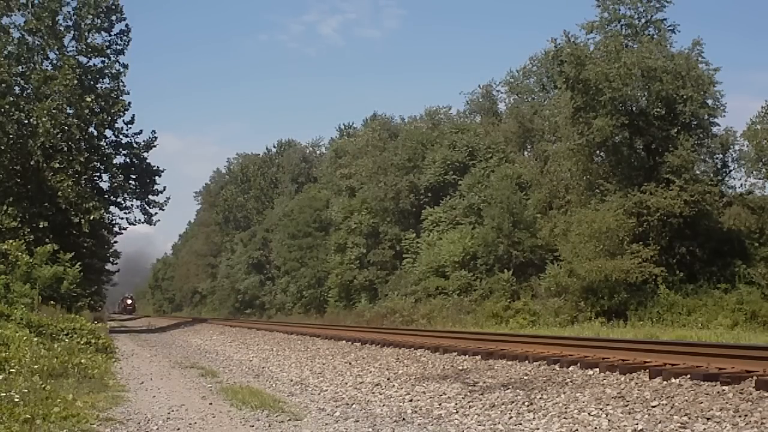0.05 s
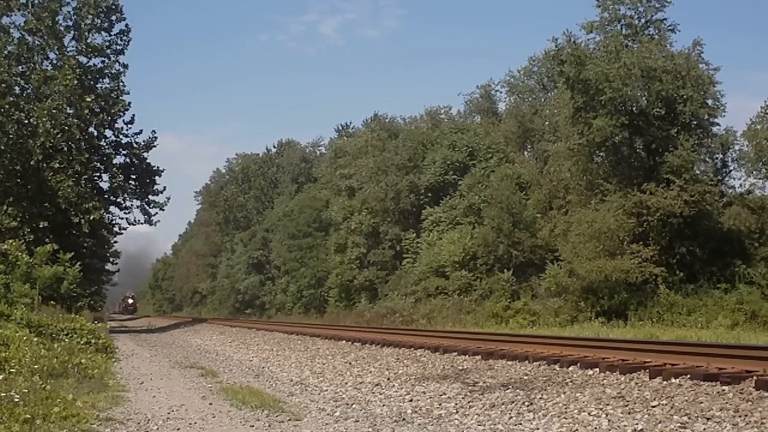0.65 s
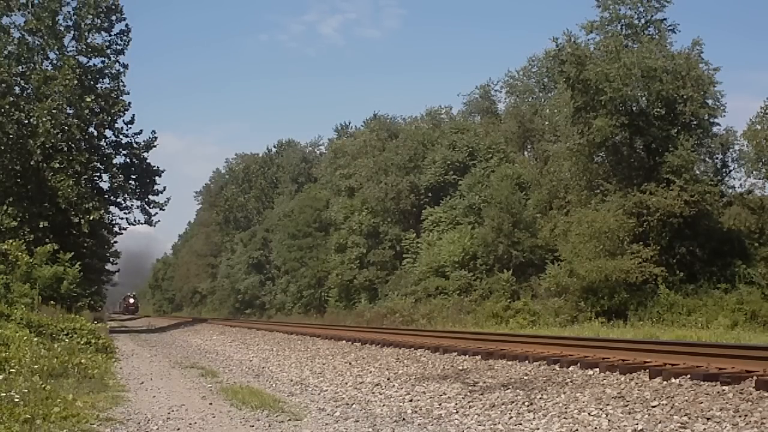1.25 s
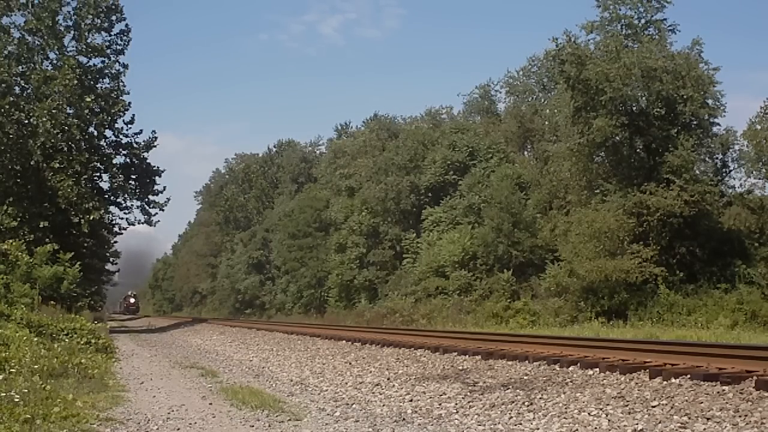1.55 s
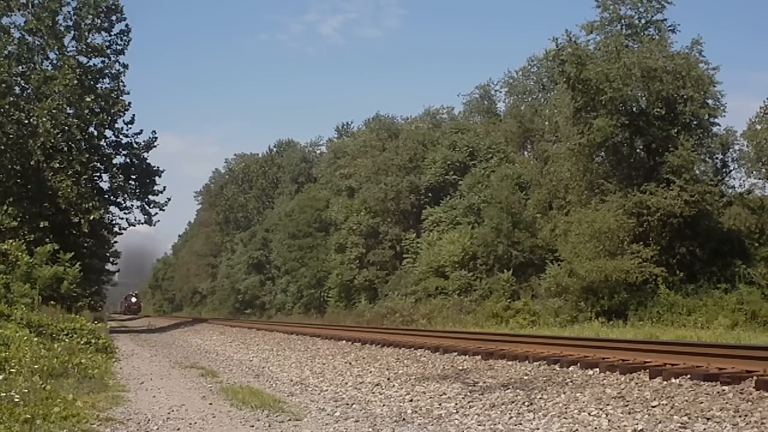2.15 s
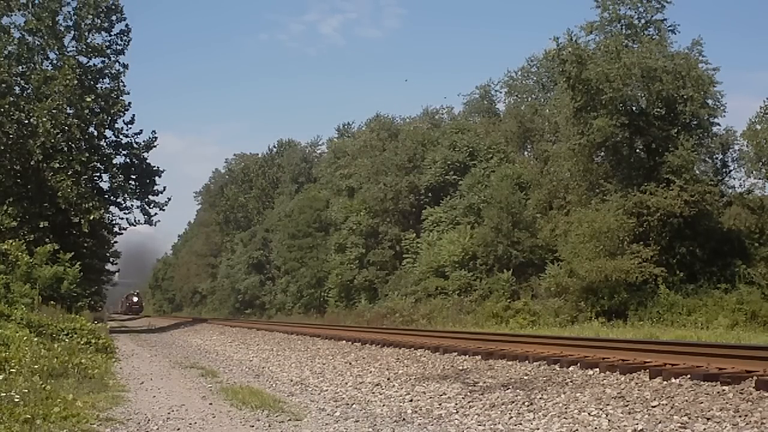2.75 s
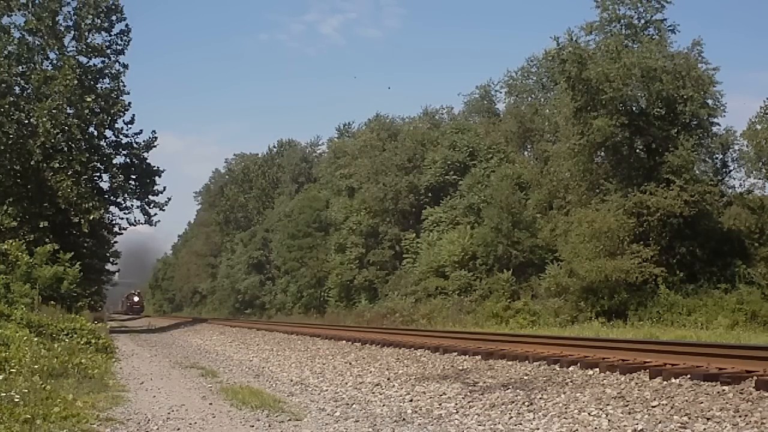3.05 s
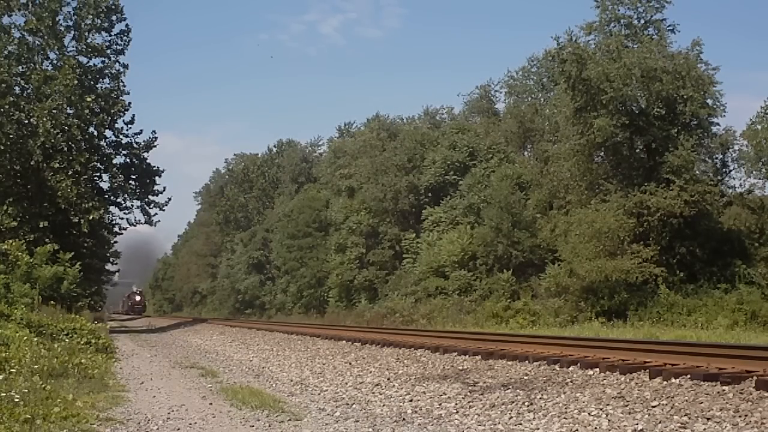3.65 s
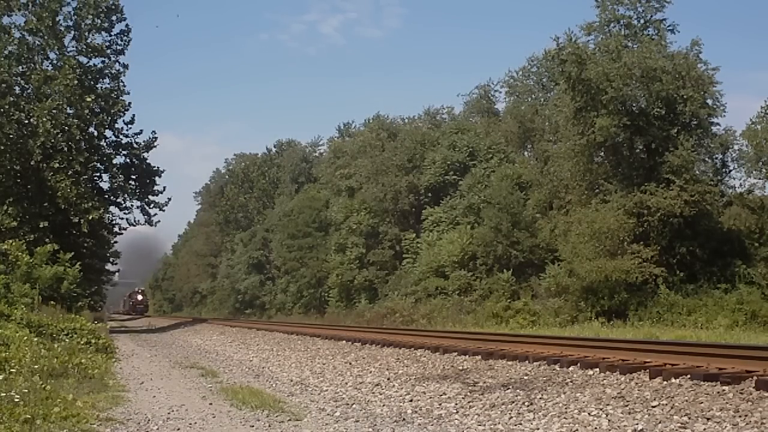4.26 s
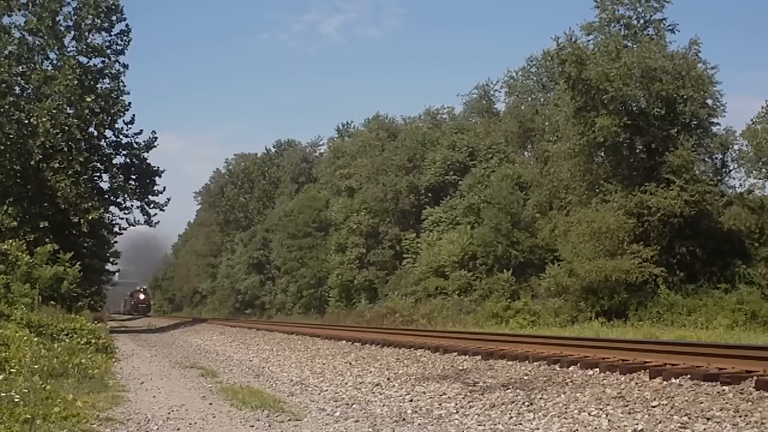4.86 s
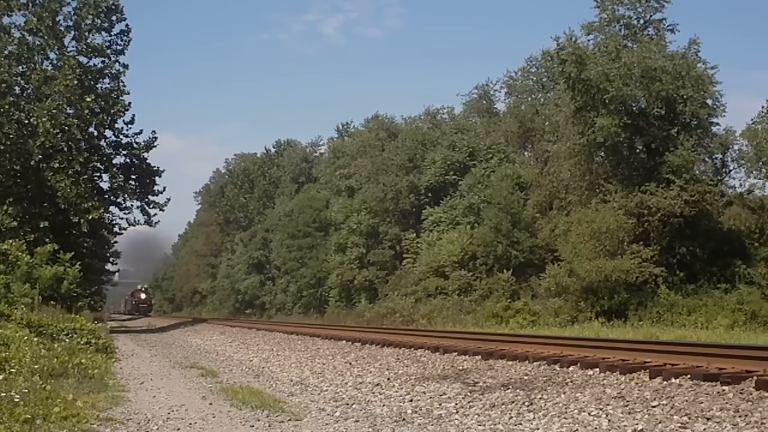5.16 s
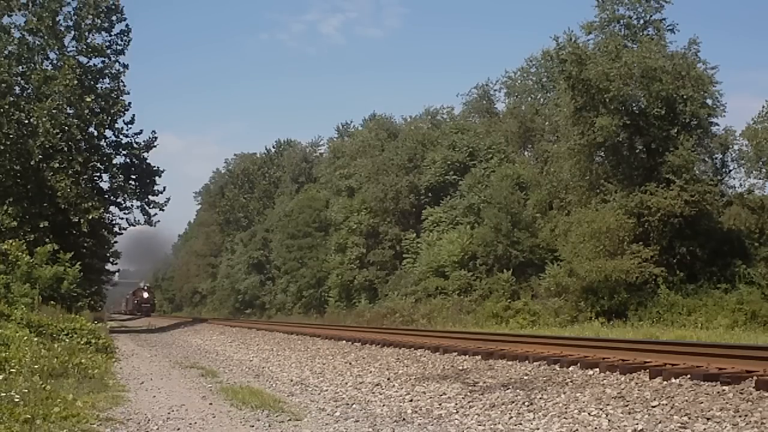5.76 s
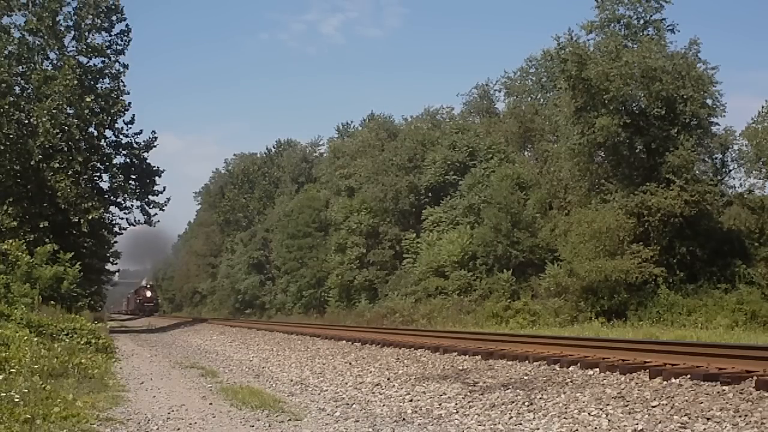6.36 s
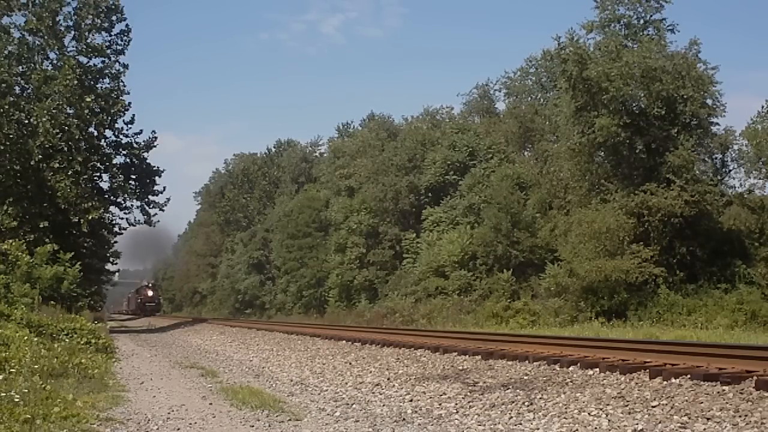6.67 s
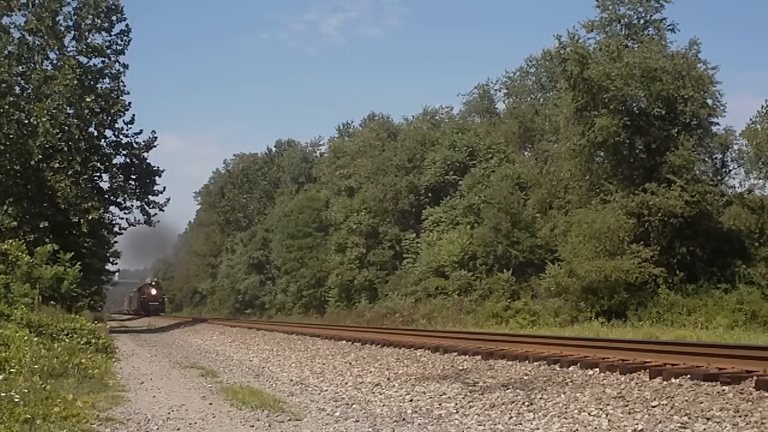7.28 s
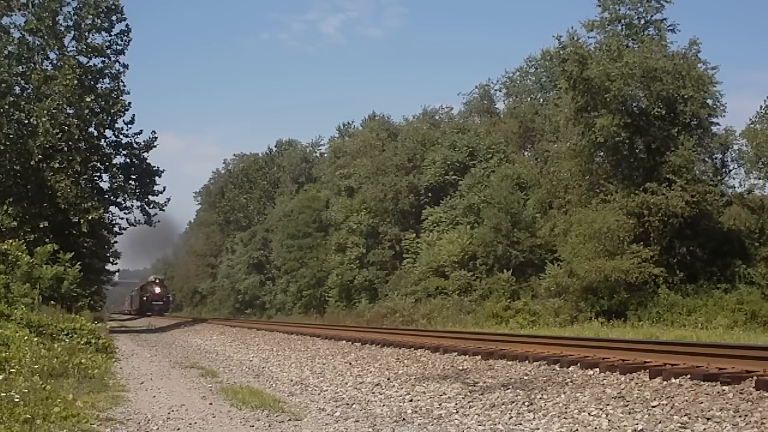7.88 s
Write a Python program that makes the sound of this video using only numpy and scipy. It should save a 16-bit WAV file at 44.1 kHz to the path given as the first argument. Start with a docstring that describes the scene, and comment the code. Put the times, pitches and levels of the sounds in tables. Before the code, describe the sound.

Rapid, rhythmic chuffing from a distant steam engine carries through the woods to a trackside microphone, over a soft rolling roar and a faint steam leak. The level holds fairly steady at first, then the beats gain a deeper boom. Toward the end the puffs, spitting steam and running noise all build clearly as the locomotive closes in, still approaching without passing.

```python
"""Beside a wooded railway line, a steam locomotive approaches at speed, some twelve beats a second.
Each exhaust beat is a turbulent puff from the chimney: a low thud, a resonant bark, a narrow ring
and a hiss of steam. Under them the running train roars, leaks steam and rumbles; train and thud grow
as it nears. A bank colours the sound, which is a little hollow at first, and the woods smear the beats."""
import sys
import numpy as np
from scipy import signal
from scipy.fft import rfft, irfft, next_fast_len
from scipy.io import wavfile
from scipy.ndimage import map_coordinates

SR = 44100
rng = np.random.default_rng(int(sys.argv[2]) if len(sys.argv) > 2 else 0)


def to_wav(s):
    """Save 16-bit WAV."""
    ch = np.atleast_2d(s).T  # columns
    pcm = np.round(np.clip(ch, -1, 1) * 32767)  # PCM
    wavfile.write(sys.argv[1], SR, pcm.astype(np.int16))


N = 353680


def amp(db):
    """Decibels to gain."""
    return 10 ** (np.asarray(db) / 20)


def unit(x):
    """x at rms 1."""
    return x / np.sqrt(np.mean(x ** 2) + 1e-20)


def along(points, hz):
    """Read (Hz, value) points on a log frequency axis."""
    point_hz, values = np.transpose(points)
    return np.interp(np.log(hz + 1), np.log(point_hz + 1), values)


def curves(rows):
    """One automation curve, a value per sample, for each column after the time."""
    times, *columns = np.transpose(rows)
    return [np.interp(np.arange(N) / SR, times, column) for column in columns]


def wobble(rate):
    """A smooth random curve, rate knots a second."""
    knots = rng.standard_normal(int(N * rate / SR) + 4)
    return map_coordinates(knots, [np.arange(N) * rate / SR])


def filtered(x, response):
    """x through an EQ whose gain is response(hz)."""
    size = next_fast_len(N + SR // 2)
    return irfft(rfft(x, size) * response(np.fft.rfftfreq(size, 1 / SR)), size)[:N]


# Four beats to a wheel turn; uneven valves make the middle two stronger.
# Each row: seconds into the turn, bark accent in dB, hiss accent in dB.
TURN_BEATS = [(0.004, -2, -1), (0.084, 0.5, 3), (0.161, -1.03, 1.85), (0.246, -2, -1)]
# Single beats that hit harder or softer. Each row: time in seconds, extra bark in dB, extra hiss in dB.
STANDOUT_BEATS = [(0.40, 0.5, -1), (0.48, 1, -2.5), (0.72, 0.5, 0), (0.80, 1, 2), (1.05, -0.5, 0.5),
                  (1.13, 2, -3), (1.37, 0, -0.5), (1.45, 1.5, 1), (1.53, 1.5, 3.5), (1.61, 2.5, 0),
                  (1.69, 2, 1.2), (1.77, 1, 2), (2.01, 0.5, -0.5), (2.09, 1.5, 1), (2.17, -0.5, 1),
                  (2.25, 1.5, 1), (2.33, -0.2, 0), (2.41, 1, -0.5), (2.65, 0.5, -1), (2.90, 2, -0.5),
                  (2.98, -1.5, 1), (3.22, 2.5, -1), (3.37, -0.5, 0.5), (3.62, -1.5, -1), (3.78, 0, -1),
                  (3.94, -0.5, -1.5), (4.34, 2.5, 0), (4.42, -1.5, 2), (4.66, 1, -1), (4.82, -1.5, 0),
                  (5.22, 0, -0.9), (5.79, -1.5, -1.5), (5.87, 2, 1.5), (6.11, 3.5, 0), (6.19, 0.5, -0.5),
                  (6.27, 1.5, -1), (6.35, 2, 0), (6.43, 1, 1), (6.59, 2.5, 3), (6.67, -1, 1.5),
                  (6.75, -3.5, 0.5), (6.83, -0.5, -1.5), (6.91, 1.5, 0), (6.99, 2.5, 0.5), (7.07, 2, 2.5),
                  (7.15, 1.1, 1), (7.55, 3, -0.5), (7.71, 1.5, -2), (7.87, 2.5, 0.5), (7.96, 2.5, 0.5)]

def beats(turn_s=0.3213, scatter_s=0.0018):
    """Times and accents of the exhaust: the same four beats every wheel turn, none quite on time."""
    turns = np.arange(int(N / SR / turn_s) + 1) * turn_s
    times, bark_db, hiss_db = np.tile(np.transpose(TURN_BEATS), len(turns))
    times = times + np.repeat(turns, len(TURN_BEATS))
    for when, extra_bark_db, extra_hiss_db in STANDOUT_BEATS:
        nearest = np.argmin(abs(times - when))
        bark_db[nearest] += extra_bark_db
        hiss_db[nearest] += extra_hiss_db
    return times + scatter_s * rng.standard_normal(len(times)), bark_db, hiss_db


def puffs(times, levels_db, rise_s, base_fall_s, lead_s):
    """Flow envelope: the valve opens quickly, then the cylinder empties; puffs add in power."""
    power = np.zeros(N)
    for when, db in zip(times, levels_db):
        span = np.arange(max(int(when * SR) - SR // 10, 0), min(int(when * SR) + SR // 4, N))
        since_peak = span / SR - when + lead_s
        fall_s = base_fall_s * (1 + 0.039 * when)  # the beats run together as the engine nears
        shape = np.exp(-np.where(since_peak < 0, (since_peak / rise_s) ** 2, since_peak / fall_s))
        power[span] += (amp(db) * shape) ** 2
    return np.sqrt(power)


# Fixed peaks and hollows that colour the puffs, roar and steam.
# Each row: centre in Hz, width in Hz, lift in dB.
COLOUR_EQ = [(117, 19, 1.5), (266.5, 52, 5.5), (392.5, 21, 4.5), (503, 12, 0), (607, 41, 3), (763, 68, 4),
             (957, 61, 5), (1083, 34, 3.5), (1162, 32, -3), (1248, 33, 3.5), (1329, 41, 5.5),
             (1640, 25, -0.5), (1810, 50, -3), (2320, 244, 3), (2593, 118, -6), (4430, 130, -2.5),
             (5360, 160, 3)]

def colour_db(hz):
    """The summed lift or dip of the EQ bells at each frequency."""
    return sum(db * np.exp(-0.5 * ((hz - centre) / width) ** 2) for centre, width, db in COLOUR_EQ)


def jet(spectrum, rough_db):
    """Coloured turbulent flow of rms 1: eddies make it come in spurts."""
    eddies = amp(rough_db * wobble(400))
    flow = eddies * rng.standard_normal(N)
    return unit(filtered(flow, lambda hz: amp(along(spectrum, hz) + colour_db(hz))))


# Tone of the thud and of the boom inside it. Each row: frequency in Hz, level in dB.
THUD_EQ = [(30, -20.5), (70, -5.5), (110, -7), (175, -7), (250, -6), (330, -9.5), (470, -7), (620, -24),
           (1200, -64)]
BOOM_EQ = [(50, -22.5), (90, -7), (135, -1.5), (175, 5.5), (220, -9), (400, -48)]
# The boom coming in. Each row: time in seconds, level in dB against the thud.
BOOM_FADER = [(3.7, -19.5), (4.5, -4), (5.8, -6.5), (7.0, -4.5), (8.0, -3)]

def thud(times, accent_db):
    """The low punch of each puff; soft ground swallows its boom until the engine is near."""
    boom_db, = curves(BOOM_FADER)
    body = jet(THUD_EQ, rough_db=0.5) + amp(boom_db) * jet(BOOM_EQ, rough_db=-0.5)
    return body * puffs(times, accent_db + 0.75, rise_s=0.015, base_fall_s=0.039, lead_s=0.0091)


# The bark's two colours. Each row: frequency in Hz, level in dB.
BRIGHT_BARK_EQ = [(200, -51.5), (400, -14), (540, -2), (850, 1), (1000, -1), (1180, 0.5), (1450, -5),
                  (1650, -9.5), (1850, -15), (2600, -17), (5000, -61)]
DULL_BARK_EQ = [(200, -36.5), (400, -5), (540, -2.5), (800, -1.2), (950, -7.5), (1180, -7), (1450, -6.5),
                (1650, -9.5), (2100, -10), (2600, -16), (5000, -49)]

def bark(times, accent_db, brightness):
    """The chimney's throaty midrange; its colour shifts as the path over the ground changes."""
    bright = np.sqrt(brightness) * jet(BRIGHT_BARK_EQ, rough_db=2.0)
    dull = np.sqrt(1 - brightness) * jet(DULL_BARK_EQ, rough_db=0.5)
    return (bright + dull) * puffs(times, accent_db + 2, rise_s=0.021, base_fall_s=0.041, lead_s=0.0018)


# The ring on top of the bark. Each row: time in seconds, trim in dB, pitch in Hz.
RING_PATH = [(0.0, 0.5, 1395), (1.2, -7.5, 1376), (2.0, -10, 1275), (3.4, -25, 1293), (4.3, -12, 1395),
             (5.5, -7, 1330), (6.5, -8, 1310), (7.1, -3.5, 1294), (8.0, -6.5, 1310)]

def ring(times, accent_db, width_hz=170):
    """A narrow resonance with a drifting centre, fed by the turbulence of each puff."""
    trim_db, pitch_hz = curves(RING_PATH)
    phase = 2 * np.pi * np.cumsum(pitch_hz) / SR
    slow_noise = lambda: filtered(rng.standard_normal(N), lambda hz: 1 / (1 + (hz / width_hz) ** 2) ** 2)
    band = unit(slow_noise() * np.cos(phase) + slow_noise() * np.sin(phase))
    return band * amp(trim_db) * puffs(times, accent_db, rise_s=0.015, base_fall_s=0.038, lead_s=0.004)


# Tone of the steam's hiss. Each row: frequency in Hz, level in dB.
HISS_EQ = [(900, -36), (1600, -6.5), (2000, 1.5), (2400, -7.5), (2900, 3), (4100, 3.5), (4800, 3),
           (5350, 6.5), (5700, 1.5), (6150, 1.5), (6500, -17.5), (7050, -7.5), (7400, -36.5)]

def hiss(times, accent_db):
    """Steam spitting from the chimney on each beat."""
    steam = jet(HISS_EQ, rough_db=0.5)
    return steam * puffs(times, accent_db, rise_s=0.016, base_fall_s=0.038, lead_s=0.0025)


# The exhaust drawing near. Each row: time in seconds, body fader in dB, hiss fader in dB.
EXHAUST_FADERS = [(0.0, -31, -44.5), (0.4, -32, -46), (1.2, -30.5, -43.5), (1.7, -29.5, -43.5),
                  (2.1, -29.5, -44), (2.65, -28.5, -42), (3.0, -32, -45), (3.55, -29, -42),
                  (4.05, -31.5, -44.5), (4.55, -29, -40.5), (5.25, -30, -39), (5.7, -31.5, -42),
                  (6.15, -29.5, -32.5), (6.55, -24.5, -32.5), (7.15, -23.5, -29.5), (7.38, -25.5, -33.5),
                  (8.0, -22.5, -27.5)]

def exhaust(thud_db, brightness):
    """Spent steam blasts up the chimney: a body of thud, bark and ring, with hiss on top."""
    times, accent_db, hiss_accent_db = beats()
    body_db, hiss_db = curves(EXHAUST_FADERS)
    body = amp(thud_db) * thud(times, accent_db)
    body += bark(times, accent_db, brightness)
    body += ring(times, accent_db)
    return amp(body_db) * body + amp(hiss_db) * hiss(times, hiss_accent_db)


# Tone of the rolling roar, the steam leak and the rumble. Each row: frequency in Hz, level in dB.
ROAR_EQ = [(60, -8), (130, 4.5), (260, 0), (500, 1.5), (800, 0.5), (1100, -0.5), (1450, -4.5), (1800, -7),
           (2600, -21), (5000, -56.5)]
LEAK_EQ = [(1200, -18), (2000, 1.5), (3000, 5), (4000, 3.5), (5300, 2.5), (6100, -0.5), (6500, -14),
           (7050, -11.5), (7400, -46.5)]
RUMBLE_EQ = [(8, -15.5), (22, 2), (40, 6), (60, -4.5), (85, -4.5), (110, -2), (160, -27.5), (400, -63)]

def train(train_db):
    """The running engine roars and leaks steam at the cylinders, over a steadily growing rumble."""
    roar = jet(ROAR_EQ, rough_db=1.5) * amp(train_db - 2.5 + 0.44 * wobble(9.1))
    leak = jet(LEAK_EQ, rough_db=-0.5) * amp(train_db - 12 + 0.26 * wobble(2.3))
    rumble = unit(filtered(rng.standard_normal(N), lambda hz: amp(along(RUMBLE_EQ, hz))))
    rumble_db = -44 + 1.15 * np.arange(N) / SR
    return roar + leak + rumble * amp(rumble_db)


# The slap off the bank. Each row: time in seconds, delay in seconds, level in dB.
BANK_SLAP = [(0, 0.0070, -24), (2.7, 0.0066, -22), (4.5, 0.00675, -16), (6.1, 0.0072, -15),
             (7, 0.0076, -16), (8, 0.0077, -17)]
# A hollow colouring, strongest early. Each row: time in seconds, level in dB.
HOLLOW_COLOUR = [(0, -13), (3.8, -15), (5, -26), (8, -26)]

def combs(x, hollow_lag_s=0.0059, cutoff_hz=1700):
    """Dull copies: the bank's sweeps a comb through the sound; a fixed, inverted one hollows it."""
    bank_lag_s, bank_db = curves(BANK_SLAP)
    hollow_db, = curves(HOLLOW_COLOUR)
    dull = filtered(x, lambda hz: 1 / (1 + (hz / cutoff_hz) ** 4))
    delayed = lambda lag_s: map_coordinates(dull, [np.arange(N) - lag_s * SR], order=1)
    return amp(bank_db) * delayed(bank_lag_s) - amp(hollow_db) * delayed(hollow_lag_s)


# Reverb of the woods. Each row: frequency in Hz, seconds to die away by 60 dB.
WOODS_DECAY = [(100, 0.99), (1000, 1), (6000, 0.48)]

def woods(x, stretches=17):
    """Trees scatter the sound back late and diffuse; the moving engine meets ever new trees."""
    hz, t, noise = signal.stft(rng.standard_normal((stretches, SR)), SR, nperseg=256)
    decay = amp(-60 * t / along(WOODS_DECAY, hz)[:, None])
    _, tails = signal.istft(noise * decay, SR, nperseg=256)
    position = np.linspace(0, stretches - 1, N)
    wet = np.zeros(N)
    for stretch, tail in enumerate(tails):
        crossfade = np.sqrt(np.clip(1 - abs(position - stretch), 0, 1))
        wet += signal.oaconvolve(x * crossfade, tail / np.linalg.norm(tail))[:N]
    return wet


# The mix as the engine closes in.
# Each row: time in seconds, train fader in dB, thud trim in dB, bark brightness from 0 to 1.
APPROACH_MIX = [(0.0, -34.5, -10.5, 0.84), (1.3, -34.5, -9, 0.94), (2.2, -35.5, -7, 0.97),
                (3.4, -32.5, -3, 0.68), (4.6, -34.5, -4, 0.05), (5.7, -30.5, -1, 0.1),
                (6.3, -28.5, -4, 0.9), (6.8, -25, -5, 0.98), (7.4, -22, 1, 1), (8.0, -22, -5, 0.7)]

def scene():
    """Exhaust and train get the bank's slap and the hollow colour; only the exhaust feeds the woods."""
    train_db, thud_db, brightness = curves(APPROACH_MIX)
    chuffs = exhaust(thud_db, np.clip(brightness, 0, 1))
    direct = chuffs + train(train_db)
    return (direct + combs(direct) + amp(-9) * woods(chuffs))[None]


def record(dry, top_hz=7400):
    """The trackside camera keeps nothing above its band limit."""
    return filtered(dry[0], lambda hz: hz < top_hz)[None]


dry = scene()
out = record(dry)
to_wav(out)
```